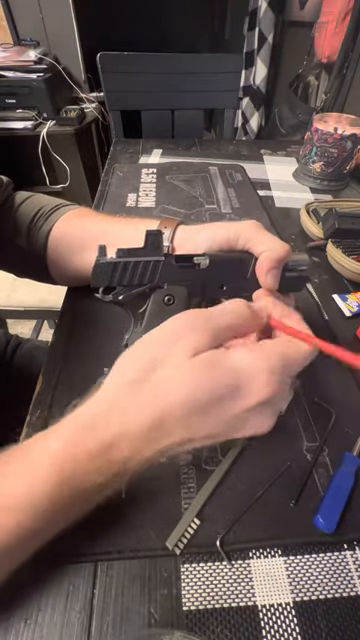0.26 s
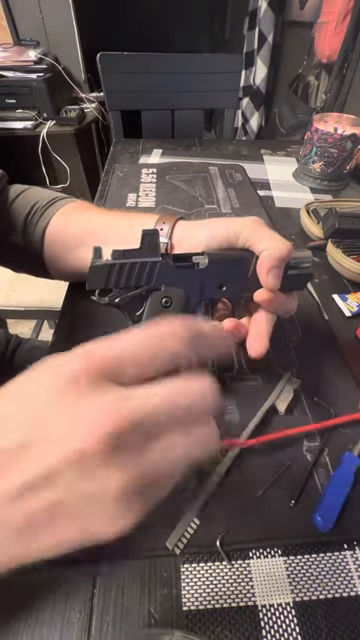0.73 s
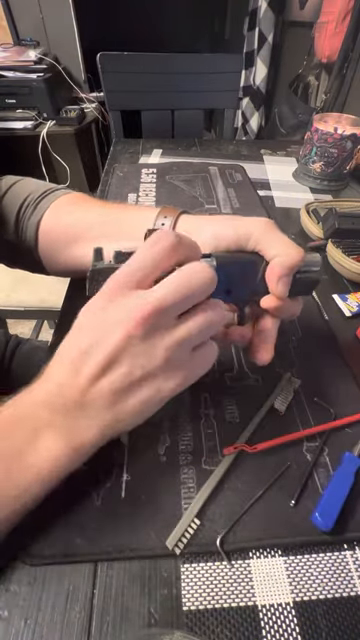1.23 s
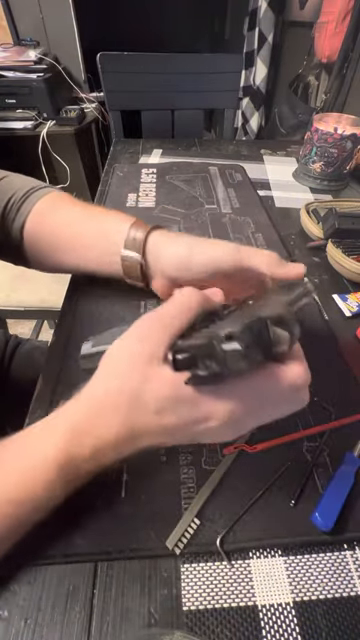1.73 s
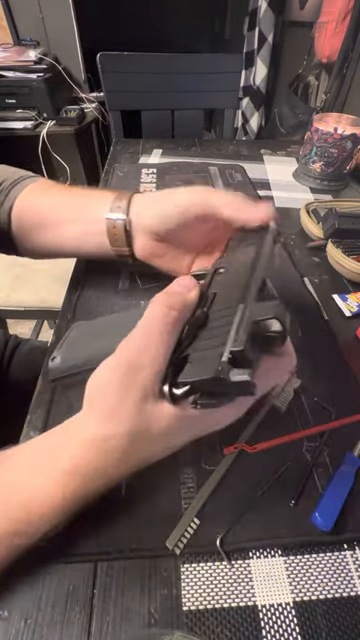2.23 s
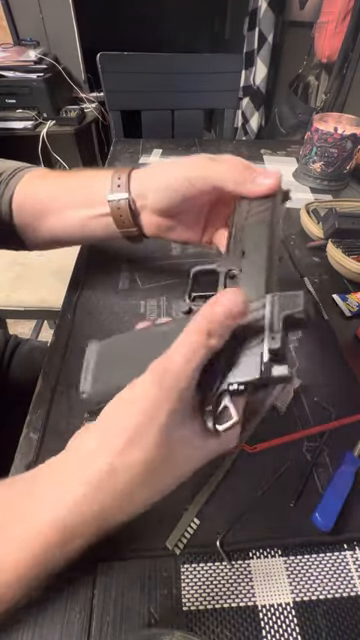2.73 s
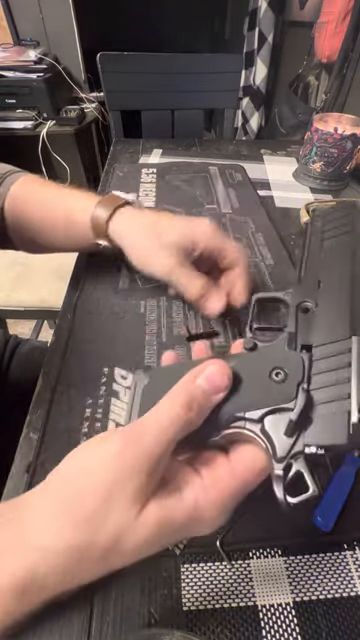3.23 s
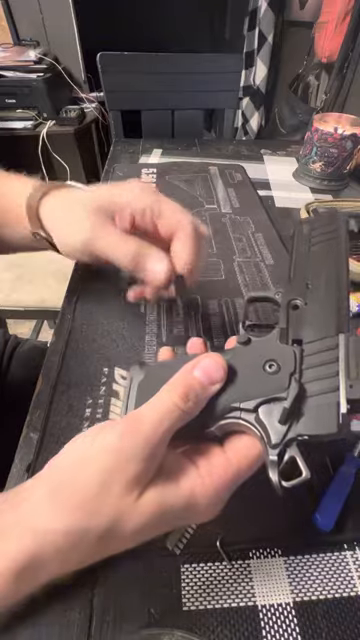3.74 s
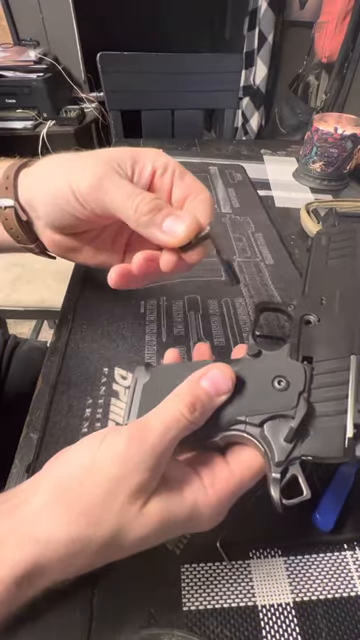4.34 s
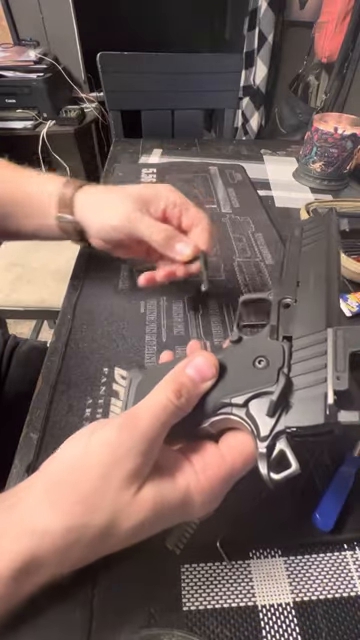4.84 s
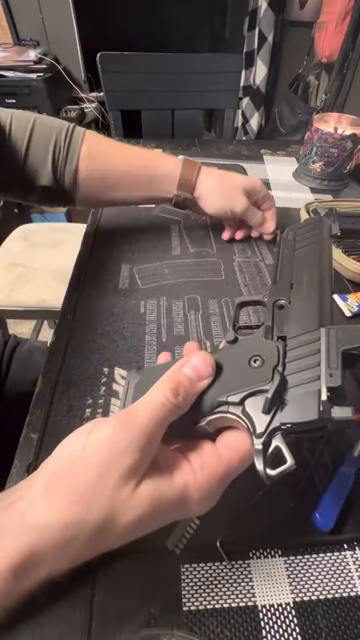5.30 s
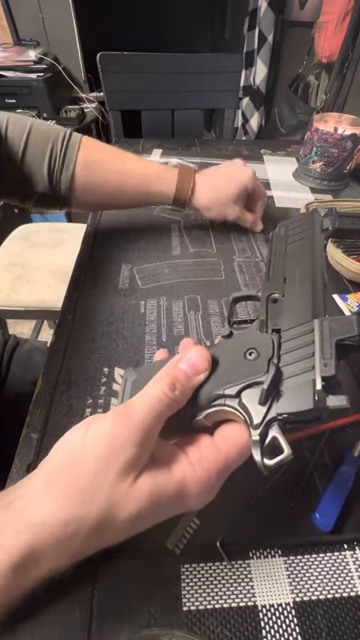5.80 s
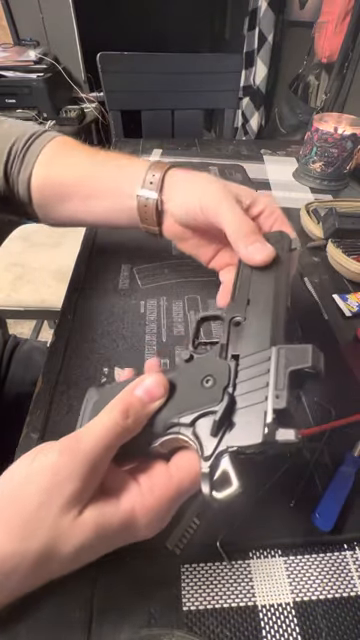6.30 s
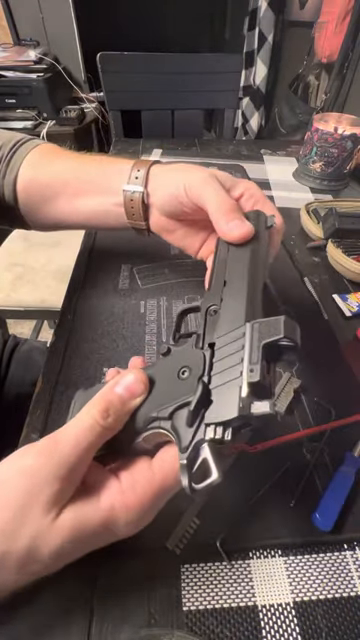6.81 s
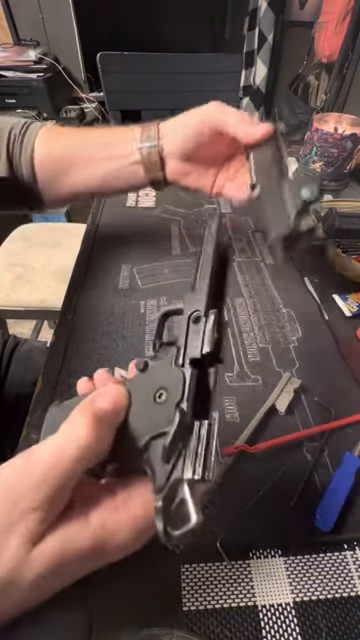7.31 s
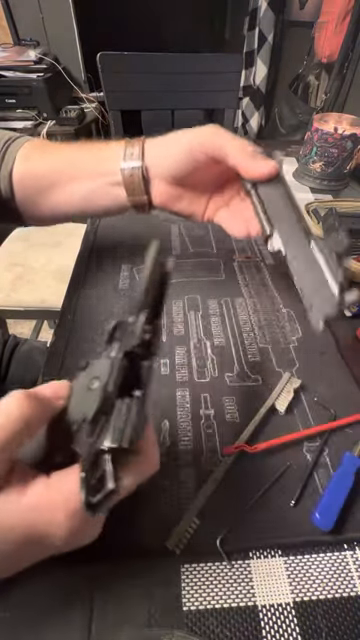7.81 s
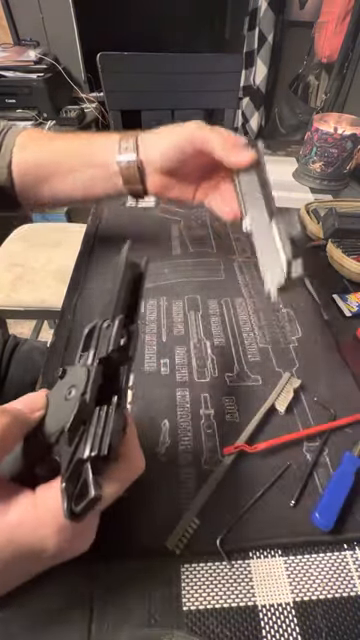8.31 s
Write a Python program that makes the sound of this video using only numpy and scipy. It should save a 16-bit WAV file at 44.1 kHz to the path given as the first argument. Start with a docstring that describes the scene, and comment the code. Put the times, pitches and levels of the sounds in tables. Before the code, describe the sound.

Sharp metallic clicks and faint rubbing as a pistol is taken apart on a table, with a tool set down and muffled traffic outside.

```python
"""A pistol is stripped by hand over a rubber mat on a wooden table; a fan hisses throughout.
At 0.6 s a tool lands, rattles and knocks the table's modes. Steel parts then click and ring, loudest
at 2.7 s, while skin, sleeve and rails rub. From 3.5 s traffic outside swells and booms in the room's
low modes. Light knocks follow from 5.3 s, then a second burst of clicks around 7 s.
A near engine pulls from 7.5 s."""
import sys
import numpy as np
from scipy import signal
from scipy.fft import rfft, irfft, next_fast_len
from scipy.io import wavfile
from scipy.ndimage import uniform_filter1d

SR = 44100
rng = np.random.default_rng(int(sys.argv[2]) if len(sys.argv) > 2 else 0)


def persist_wave(psi):
    """Save psi, clipped to +-1, as 16-bit WAV."""
    counts = np.round(np.clip(psi, -1, 1) * 32767).astype(np.int16)
    wavfile.write(sys.argv[1], SR, np.atleast_2d(counts).T)


N = 377055

# Steel contacts. Each row: start in seconds, bright level in dB, bright pitch in Hz, body level in dB,
# clack level in dB, level of the snap's side signal in dB, t60 in seconds.
PISTOL_CONTACTS = [(0.1205, -48, 6500, -62, -60, -60, 0.012),
                   (0.1242, -29.5, 7100, -41, -47.5, -39.5, 0.01),
                   (1.3596, -37.5, 11300, -67, -57, -34, 0.039), (1.3665, -48, 11200, -66, -49, -66, .029),
                   (1.4346, -38, 8200, -46, -64, -43, 0.01), (1.4797, -42, 7200, -56, -57, -63.5, 0.066),
                   (1.5684, -56, 9350, -42.5, -41, -61, 0.0076), (1.617, -70, 5970, -82.5, -51, -75, 0.011),
                   (1.663, -70, 5970, -74, -48.5, -68, 0.012), (1.681, -70, 6020, -74, -48, -73, 0.011),
                   (2.0092, -46, 8070, -62, -51, -68, 0.045), (2.017, -30, 7950, -60, -43, -32.5, 0.0073),
                   (2.0354, -39, 6180, -51, -40.5, -54, 0.018), (2.253, -59, 8370, -76, -69.5, -57, 0.005),
                   (2.3043, -58, 4650, -64, -50.5, -80, 0.017),
                   (2.4245, -53, 9600, -63, -63.5, -56.5, 0.016), (2.5141, -45, 7370, -57, -51, -59, 0.031),
                   (2.6388, -46, 8250, -53.5, -35, -69, 0.012), (2.6654, -16, 6500, -24.5, -32, -56, 0.024),
                   (2.674, -5, 7500, -17.5, -21.5, -55, 0.014),
                   (2.6803, -11, 7370, -24.5, -28.5, -61, 0.023),
                   (2.6837, -15.5, 6570, -24.5, -24, -58, 0.026),
                   (2.7101, -26, 7320, -33, -54.5, -63, 0.0082), (2.919, -61, 6800, -51, -58, -72.5, 0.034),
                   (5.3264, -51, 5500, -45, -47, -75, 0.0074), (6.0633, -53.5, 5837, -56.5, -47, -67, 0.02),
                   (6.4615, -56.5, 6000, -48, -57, -74, 0.012), (6.4712, -37, 6160, -27, -51, -56, 0.0083),
                   (6.4791, -57, 6680, -57, -32, -70, 0.0068), (6.851, -51, 5300, -33, -24.5, -60, 0.0092),
                   (6.863, -38, 6250, -59.5, -59, -63.5, 0.012),
                   (6.884, -46.5, 7500, -41, -66.5, -63.5, 0.035),
                   (6.8911, -20.5, 6740, -24.5, -25.5, -37.5, 0.0052),
                   (6.8942, -19.5, 6200, -20.5, -27, -28.5, 0.007),
                   (6.8975, -30.5, 7950, -22, -38, -38, 0.011), (7.0531, -20, 8850, -24, -39, -38, 0.0086),
                   (7.0648, -18.5, 8900, -34.5, -33, -16.5, 0.011),
                   (7.0686, -13.5, 7220, -23, -41, -13.5, 0.0074),
                   (7.0707, -17.5, 7160, -30.5, -34, -37.5, 0.0032),
                   (7.134, -32.5, 7800, -44, -41, -67, 0.028), (7.1412, -45, 8510, -39, -28, -67, 0.02),
                   (7.1485, -35.5, 8430, -40, -30, -42, 0.018), (7.1575, -51, 7670, -39, -33, -55, 0.022),
                   (7.168, -41.5, 6160, -50, -36, -46, 0.0073)]
TOOL_CONTACTS = [(0.5978, -63, 6240, -52.5, -40.5, -82, 0.034),
                 (0.6077, -62, 8550, -51.5, -64.5, -79, 0.0085),
                 (0.6142, -24, 8300, -63, -47, -56.5, 0.0088), (0.616, -33, 7400, -23, -42, -57, 0.004),
                 (0.617, -59, 7400, -60.5, -15, -70.5, 0.012),
                 (0.6228, -4, 8090, -29, -49.5, -17.5, 0.0026),
                 (0.6283, -22, 8740, -50.5, -44, -42.5, 0.003), (0.636, -35.5, 8600, -56, -60, -61, 0.02),
                 (0.692, -43, 9400, -68, -66, -65, 0.02), (0.7585, -76, 6000, -55, -72, -83, 0.0064)]
# Struck modes. Each row: frequency in Hz, relative level in dB, t60 in seconds.
PISTOL_MODES = [(2920, -9, 0.26), (3666, -7.5, 0.11), (3840, -6.5, 0.16), (4192, -10, 0.24),
                (4900, -8, 0.23), (4446, -7.5, 0.2), (5150, -6.5, 0.18), (6320, -3.5, 0.2),
                (6800, -6.5, 0.3), (6800, -10.5, 0.55), (7540, -4.5, 0.2606), (8090, -3, 0.24),
                (9100, -8, 0.34), (10695, -18.5, 0.41)]
TOOL_MODES = [(3644, -9.5, 0.1), (5600, -4, 0.15), (6770, -7, 0.08), (7240, -3, 0.078), (8370, 0.5, 0.1),
              (8730, 3.5, 0.18), (10960, -9, 0.0993), (10700, -8.5, 0.16)]
TABLE_MODES = [(122, -1, 0.069), (197.4, 2.5, 0.13), (250, 4.5, 0.077), (309, 9, 0.065), (419.7, 0, 0.076),
               (556, -7.5, 0.2), (950, -15.5, 0.04), (1200, -7.5, 0.04)]
# Duller tones; the pistol's shift with grip and slide position.
# Each row: time in seconds, body pitch in Hz, clack pitch in Hz.
PISTOL_TONES = [(1.57, 2676, 1103), (1.69, 2810, 1053), (2.0, 2790, 1504), (2.64, 2770, 1570),
                (2.669, 2680, 1517), (2.677, 2690, 1803), (2.683, 2666, 1150), (5.33, 2500, 1090),
                (6.47, 3100, 1167), (6.849, 2500, 1420), (6.881, 3450, 920), (6.897, 3070, 1420),
                (7.051, 2840, 1410), (7.066, 3500, 1490), (7.13, 2820, 1546)]
TOOL_TONES = [(0.6, 3016, 771.5)]
# Blows on the table. Each row: start in seconds, peak in dB, hardness in Hz.
TABLE_KNOCKS = [(0.124, -52, 203), (0.616, -23.5, 370), (0.634, -29, 209), (0.663, -46, 218),
                (0.68, -41.5, 218), (0.692, -38, 310), (0.706, -53, 202), (1.571, -25.5, 284),
                (1.617, -34.5, 280), (1.661, -43, 313), (1.675, -35, 249), (1.709, -44, 210),
                (1.729, -51, 238), (5.327, -37, 243), (5.735, -39.5, 204.4), (6.066, -43.5, 330),
                (6.849, -47, 757), (6.892, -40, 750), (7.053, -47, 750), (7.068, -48, 750)]
# Rubbing. Each row: start and length in seconds, then treble, middle and scuff levels in dB.
RUB_STROKES = [(0.115, 0.015, -69, -72, -88), (0.247, 0.078, -68.5, -89, -97), (0.99, 0.026, -75, -84, -92),
               (1.03, 0.092, -84, -106, -103), (1.24, 0.059, -79, -90, -94), (1.33, 0.018, -85, -66, -87),
               (1.38, 0.039, -61.5, -59.5, -94), (1.47, 0.023, -60.5, -64.5, -64),
               (1.71, 0.018, -81, -94, -87), (1.81, 0.025, -78.5, -97, -97), (1.98, 0.036, -74, -73, -70),
               (2.2, 0.051, -75.5, -99, -94), (2.51, 0.052, -73.5, -78, -85), (2.57, 0.046, -79, -90, -87),
               (2.63, 0.069, -55.5, -59.5, -60), (3.25, 0.022, -85, -90, -61.5),
               (3.32, 0.12, -63.5, -67.5, -59.5), (5.32, 0.037, -69, -72.5, -81),
               (5.39, 0.034, -73, -76.5, -82), (5.46, 0.021, -81.5, -84, -87),
               (5.54, 0.18, -69.5, -71.5, -88), (6.065, 0.061, -71, -77, -67.5),
               (6.2, 0.074, -78.5, -90.5, -73), (6.41, 0.055, -76.5, -83.5, -68.5),
               (6.85, 0.03, -70, -68, -58.5), (7.03, 0.057, -66, -65.5, -66), (7.085, 0.032, -53, -58, -67),
               (7.14, 0.01, -70, -69, -62), (7.63, .21, -67.5, -76, -85.5)]
# Loose parts. Each row: start in seconds, treble and middle levels in dB, t60 in seconds.
PART_SHIVERS = [(0.628, -60.5, -51.5, 0.22), (1.575, -65, -68, 0.19), (2.045, -79, -64, 0.066),
                (2.689, -29, -47, 0.24), (2.8, -66.5, -64.5, 1)]
# Road noise. Each row: time in seconds, boom level in dB, roar level in dB.
TRAFFIC_LEVELS = [(0.0, -61.5, -65), (0.62, -61, -68), (0.9, -65, -76.5), (1.76, -54.5, -68.5),
                  (2.07, -60, -69), (2.93, -55, -64), (3.5, -45, -58.5), (3.88, -41.5, -54),
                  (4.71, -42.5, -48), (4.98, -46.5, -55.5), (5.67, -46.5, -55), (6.24, -50, -58.5),
                  (6.64, -45, -59), (7.19, -41, -56), (7.95, -42, -52), (8.12, -41.5, -49),
                  (8.31, -42.5, -60), (8.55, -45.5, -54.5)]
# Near engine. Each row: start and length in seconds, drone and whine levels in dB.
ENGINE_PULLS = [(5.75, 0.61, -61.5, -81.5), (7.5, 0.2, -40, -57.5), (7.95, 0.24, -46, -49),
                (8.15, 0.13, -50, -64), (8.3, 0.087, -46.5, -55)]
# Noise resonances. Each row: centre in Hz, width in Hz, relative weight in dB.
SLIDE_BANDS = [(1090, 310, -14.5), (2925, 250, -11.5), (3770, 550, -8.5), (4550, 400, -4.5),
               (6722, 341, -7), (7354, 300, -1), (8300, 250, -2), (8800, 400, -5.5)]
MAT_BANDS = [(770, 520, 4.5), (1300, 1000, -5.5)]
BOOM_BANDS = [(73.4, 13.9, 5.5), (107.1, 33.4, 1)]
DRONE_BANDS = [(191.1, 26, 0)]
ROAR_BANDS = [(241.15, 24, -4), (330.5, 37, -12)]
WHINE_BANDS = [(389, 53, 4), (430, 177, -20.5)]
TYRE_BANDS = [(783, 630, -1), (677, 60, -3), (1110, 2100, -11.5)]
SKIN_BAND = [(6250, 1100, 0)]
BLADE_BAND = [(1770, 108.4, 0)]
# Noise spectra. Each row: frequency in Hz, relative level in dB.
RUSTLE_SPECTRUM = [(2350, -32), (4000, -7.5), (4900, -15), (6300, -8.5), (7370, -8.5), (8600, -9.5),
                   (10500, -10.5)]
SCRAPE_SPECTRUM = [(410, -34), (700, -10.5), (1530, -3.5), (2210, -3), (2830, -4.5), (3290, -5),
                   (5000, -47), (6500, -46.5), (11000, -120)]
FAN_SPECTRUM = [(260, -33), (450, -3), (706, -6), (976, -2), (1490, -8), (1810, 1), (2090, -8), (2730, -16),
                (4920, -26), (6620, -24.5), (10500, -32)]
ECHO_SPECTRUM = [(290, -61.5), (500, -28), (1120, -11), (1590, -17), (3500, -13.5), (4900, -14.5),
                 (5980, -13.5), (8500, -14), (10500, -14.5)]
# Background width. Each row: frequency in Hz, side minus mid in dB.
STEREO_WIDTH = [(60, -24.5), (110, -27), (200, -16), (380, -4.5), (700, 0), (1290, -7), (2380, -9.5),
                (4400, 3), (8120, -2), (15000, 14)]
# Background balance. Each row: frequency in Hz, left minus right in dB.
STEREO_BALANCE = [(60, -0.5), (110, -0.5), (200, -2.0), (380, -2.5), (700, -3.0), (1290, -1.5), (2380, 0.0),
                  (4400, 0.5), (8120, 0.0), (15000, 0.0)]

TREBLE_EDGE_HZ = 12000


def steel_clicks(contacts, modes, tones, clack_t60_ratio, pan_db, sustain_db, crack_width, lag_samples):
    """Each contact cracks, rings the steel until the grip damps it, and knocks two duller tones."""
    out, t = np.zeros((2, N)), np.arange(SR // 5) / SR
    hz, db, free_t60_s = np.transpose(modes)[..., None]
    tone_times_s, body_hz, clack_hz = np.transpose(tones)
    lowpass = signal.cheby2(8, 40, 12100, fs=SR, output="sos")
    snap_highpass = signal.cheby2(14, 80, 11400, "high", fs=SR, output="sos")
    rise_s, snap_mid_to_side = 0.0004, 70
    onset = np.clip(t / rise_s, 0, 1) ** 2

    def rough_tone(pitch_hz, width_ratio, t60_s, sustain=0):
        """Rough contact: a decaying tone broken up by noise around its pitch."""
        rough = resonate_twice(rng.standard_normal(len(t)), [(pitch_hz, width_ratio * pitch_hz, 0)])
        pure = .4 * np.sin(2 * np.pi * pitch_hz * t)
        rise = np.clip(t / max(rise_s, 1.4 / pitch_hz), 0, 1) ** 2
        tail = sustain * pure * decay(t, t60_s=.08)
        return peak_one(rise * ((pure + .5 * rough) * decay(t, t60_s) + tail))

    for start_s, bright_db, bright_hz, body_db, clack_db, snap_db, t60_s in contacts:
        # modes near the contact's pitch are struck hardest, nearly in phase
        strength = from_db(db - 2.2 * np.log2(hz / bright_hz) ** 2 + rng.standard_normal(hz.shape))
        phase_cycles = .3 * rng.random(hz.shape)
        envelope = onset * (decay(t, t60_s) + from_db(sustain_db) * decay(t, free_t60_s))
        ring = (strength * np.sin(2 * np.pi * (hz * t + phase_cycles)) * envelope).sum(axis=0)
        crack = rough_tone(bright_hz, crack_width, t60_s)
        bright = from_db(bright_db) * peak_one(peak_one(ring) + 1.7 * crack)
        body = from_db(body_db) * rough_tone(np.interp(start_s, tone_times_s, body_hz), .33, t60_s)
        clack = from_db(clack_db) * rough_tone(np.interp(start_s, tone_times_s, clack_hz), .75,
                                               clack_t60_ratio * t60_s, sustain=from_db(-28))
        left = np.roll(bright + body, 1) + np.roll(clack, lag_samples)   # longer path
        right = bright + body + clack
        stereo = signal.sosfilt(lowpass, [left, right]) * from_db([[pan_db / 2], [-pan_db / 2]])
        snap = signal.sosfilt(snap_highpass, uniform_filter1d(rng.standard_normal(len(t)), size=2))
        snap = from_db(snap_db) * peak_one(snap * onset * decay(t, 1.2 * t60_s))
        add(out, start_s, stereo + snap * (snap_mid_to_side + np.array([[1], [-1]])))
    return butterworth(out, 3, 500, "high")


def tool_drop(dip_hz=4875, dip_width_hz=1000, dip_depth=0.66):
    """The tool lands and rattles, slightly hollow from a dip near 4.9 kHz."""
    rattle = steel_clicks(TOOL_CONTACTS, TOOL_MODES, TOOL_TONES, clack_t60_ratio=0.93,
                          pan_db=2.5, sustain_db=-41, crack_width=.4, lag_samples=12)
    band = signal.lfilter(*signal.iirpeak(dip_hz, dip_hz / dip_width_hz, SR), rattle)
    return rattle - dip_depth * band


def table_knocks(rise_s=0.0066):
    """Tool and butt strike the table; harder blows reach higher modes. The mat adds a thud."""
    out, t = np.zeros(N), np.arange(SR // 3) / SR
    hz, db, t60_s = np.transpose(TABLE_MODES)[..., None]
    for start_s, peak_db, hard_hz in TABLE_KNOCKS:
        strength = from_db(db + 3 * rng.standard_normal(hz.shape)) / (1 + (hz / (1.7 * hard_hz)) ** 4)
        wood = (strength * np.sin(2 * np.pi * hz * t) * decay(t, t60_s)).sum(axis=0)
        thud = butterworth(rng.standard_normal(len(t)), 3, [120, 1.54 * hard_hz], "band")
        knock = peak_one(wood) + 0.41 * rms_one(thud) * decay(t, t60_s=0.041)
        add(out, start_s, from_db(peak_db) * peak_one(knock * np.clip(t / rise_s, 0, 1)))
    return out * from_db([[-1.5], [1.5]])


def rubbing(ring_knee_db=-56):
    """Friction: fine rustle, lower scrape, dull rubber scuff. Hard rubbing rings the slide."""
    *stroke_gains, scuff_gain = swells(RUB_STROKES, rise_db_per_s=350, fall_db_per_s=279.5)
    treble_gain, middle_gain = uniform_filter1d(stroke_gains + shivers(), size=200)
    noise = rng.standard_normal((4, 1, N)) + 0.05 * rng.standard_normal((4, 2, N))
    ring_share = 0.57 * treble_gain / (treble_gain + from_db(ring_knee_db))
    ring = ring_share * resonate_twice(noise[2], SLIDE_BANDS)
    flicker = from_db(1.2 * drift(40) + 2.5 * drift(12))
    rustle = np.sqrt(1 - ring_share ** 2) * flicker * rms_one(colour(noise[0], RUSTLE_SPECTRUM))
    skin = .45 * from_db(2.5 * drift(8)) * (1 - ring_share) * noise_bands(noise[1], SKIN_BAND)
    scrape = rms_one(colour(noise[1], SCRAPE_SPECTRUM))
    scuff = noise_bands(noise[3], MAT_BANDS)
    return treble_gain * (rustle + skin + ring) + middle_gain * scrape + scuff_gain * scuff


def shivers():
    """Loose parts shiver after a blow: decaying treble and middle gains."""
    out, t = np.zeros((2, N)), np.arange(SR // 2) / SR
    for start_s, treble_db, middle_db, t60_s in PART_SHIVERS:
        add(out, start_s, from_db([[treble_db], [middle_db]]) * decay(t, t60_s))
    return out


def room_echoes(x, room_t60_s=.3, table_t60_s=0.036, rise_s=0.0086):
    """Dense echoes, partly different on each side, with a quick first part off the table top."""
    t = np.arange(int(.6 * SR)) / SR
    noise = rng.standard_normal(len(t)) + 1.2 * rng.standard_normal((2, len(t)))
    fall = decay(t, room_t60_s) + from_db(12.5) * decay(t, table_t60_s)
    response = colour(noise, ECHO_SPECTRUM) * fall * np.clip(t / rise_s, 0, 1)
    response = signal.sosfilt(signal.cheby2(12, 70, TREBLE_EDGE_HZ, fs=SR, output="sos"), response)
    response /= np.sqrt(np.sum(response ** 2) / 2)
    return signal.fftconvolve(x.mean(axis=0)[None], response, axes=1)[:, :N]


def traffic():
    """Road noise passes the walls and fills the room's low modes; tyre hiss follows the boom."""
    noise = butterworth(wide_noise(), 4, [52, 1500], "band")
    times_s, *levels_db = np.transpose(TRAFFIC_LEVELS)
    boom_db, roar_db = (np.interp(np.arange(N) / SR, times_s, db) for db in levels_db)
    drone_gain, whine_gain = swells(ENGINE_PULLS, rise_db_per_s=146.5, fall_db_per_s=117)
    drone_gain += from_db(-60.5 + 0.73 * (boom_db - boom_db.mean()))
    whine_gain += from_db(-68 + 0.91 * (roar_db - roar_db.mean()))
    tyre_gain = from_db(-17.5) * uniform_filter1d(from_db(boom_db), size=SR // 2)
    boom = from_db(boom_db) * humming_modes(noise, BOOM_BANDS)
    drone = drone_gain * humming_modes(noise, DRONE_BANDS)
    roar = from_db(roar_db) * noise_bands(noise, ROAR_BANDS)
    whine = whine_gain * noise_bands(noise, WHINE_BANDS)
    return boom + drone + roar + whine + tyre_gain * noise_bands(noise, TYRE_BANDS)


def humming_modes(noise, bands, waver_hz=1.167):
    """Noise-driven room modes; the first also holds a wavering hum."""
    hum_hz = bands[0][0] + waver_hz * drift(3)
    return noise_bands(noise, bands) + 1.114 * np.sin(2 * np.pi * np.cumsum(hum_hz) / SR)


def fan(air_db=-67, whirr_db=-78):
    """Steady air noise with a band of blade whirr."""
    air = from_db(air_db) * rms_one(colour(wide_noise(), FAN_SPECTRUM))
    return air + from_db(whirr_db) * resonate_twice(wide_noise(), BLADE_BAND)


def building_rumble(level_db=-67.5):
    """Faint deep shaking of the building."""
    return from_db(level_db) * rms_one(butterworth(rng.standard_normal(N), 2, [18, 55], "band"))


def wide_noise():
    """Stereo noise: near mono in the bass, wider above."""
    mid, side = rng.standard_normal(N), colour(rng.standard_normal(N), STEREO_WIDTH)
    left_tilt = np.array(STEREO_BALANCE) * [1, .5]
    return np.array([colour(mid + side, left_tilt), colour(mid - side, left_tilt * [1, -1])])


def swells(rows, rise_db_per_s, fall_db_per_s, sag_db_per_s=44):
    """One gain curve per level column; each event rises, crests at mid-length and falls."""
    t, out = np.arange(N) / SR, np.zeros((len(rows[0]) - 2, N))
    for start_s, length_s, *db in rows:
        drop_db = rise_db_per_s * np.clip(start_s - t, 0, None)
        drop_db += fall_db_per_s * np.clip(t - start_s - length_s, 0, None)
        drop_db += sag_db_per_s * np.clip(abs(t - start_s - length_s / 2), 0, length_s / 2)
        active = drop_db < 60
        out[:, active] += from_db(np.array(db)[:, None] - drop_db[active])
    return out


def drift(rate_hz):
    """Slow random curve, rms about 1."""
    step, warmup = 40, 2000
    pole = np.exp(-2 * np.pi * rate_hz * step / SR)
    noise = rng.standard_normal(N // step + warmup + 2)
    slow = signal.lfilter([1], [1, -2 * pole, pole ** 2], noise)[warmup:]
    return np.interp(np.arange(N) / step, np.arange(len(slow)), rms_one(slow))


def resonate(x, bands):
    """Parallel resonators, signs alternating; rms 1."""
    out = 0
    for k, (hz, width_hz, db) in enumerate(bands):
        radius = np.exp(-np.pi * width_hz / SR)
        b = np.array([1, 0, -1]) * (1 - radius ** 2) / 2
        a = [1, -2 * radius * np.cos(2 * np.pi * hz / SR), radius ** 2]
        out = out + (-1) ** k * from_db(db) * signal.lfilter(b, a, x)
    return rms_one(out)


def resonate_twice(x, bands):
    """Two passes for steeper skirts; rms 1."""
    return resonate(resonate(x, bands), bands)


def noise_bands(noise, bands):
    """Sum of separately filtered bands with deep valleys between; rms 1."""
    return rms_one(sum(from_db(db) * np.sqrt(width_hz) * resonate_twice(noise, [(hz, width_hz, 0)])
                       for hz, width_hz, db in bands))


def colour(x, spectrum):
    """Filters by a spectrum, held flat above 10.5 kHz."""
    size = next_fast_len(x.shape[-1])
    hz, db = np.transpose(spectrum)
    bins_hz = np.clip(np.arange(size // 2 + 1) * SR / size, 1, 10500)
    gain = from_db(np.interp(np.log(bins_hz), np.log(hz), db))
    return irfft(rfft(x, size) * gain, size)[..., :x.shape[-1]]


def butterworth(x, order, edges_hz, kind):
    return signal.sosfilt(signal.butter(order, edges_hz, kind, fs=SR, output="sos"), x)


def add(out, start_s, sound):
    i = round(start_s * SR)
    out[..., i:i + sound.shape[-1]] += sound[..., :N - i]


def decay(t, t60_s):
    return from_db(-60 * t / t60_s)


def from_db(db):
    return 10 ** (np.asarray(db) / 20)


def rms_one(x):
    return x / np.sqrt(np.mean(x ** 2) + 1e-20)


def peak_one(x):
    return x / np.abs(x).max()


def scene():
    """Close handling, its echoes, and the background."""
    pistol = steel_clicks(PISTOL_CONTACTS, PISTOL_MODES, PISTOL_TONES, clack_t60_ratio=1.3,
                          pan_db=1.5, sustain_db=-43, crack_width=1.0, lag_samples=4)
    tool = tool_drop()
    handling = pistol + table_knocks() + rubbing()
    # on the rubber, the tool sends less into the room
    echoes = from_db(-13) * room_echoes(handling + from_db(-7) * tool)
    return handling + tool + echoes + traffic() + fan() + building_rumble()


def record(dry, mid_leak_db=-48, cutoff_hz=16800):
    """Above the treble edge little but the side signal passes; the very top is cut."""
    mid, side = (dry[0] + dry[1]) / 2, (dry[0] - dry[1]) / 2
    dulled = signal.sosfiltfilt(signal.cheby2(12, 40, TREBLE_EDGE_HZ, fs=SR, output="sos"), mid)
    mid = dulled + from_db(mid_leak_db) * (mid - dulled)
    lowpass = signal.cheby2(12, 70, cutoff_hz, fs=SR, output="sos")
    return signal.sosfilt(lowpass, np.array([mid + side, mid - side]))


dry = scene()
out = record(dry)
persist_wave(out)
```